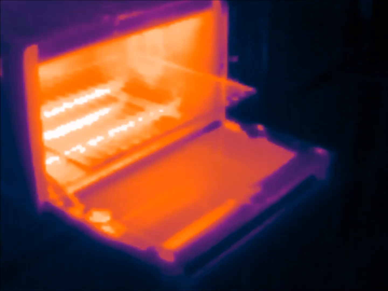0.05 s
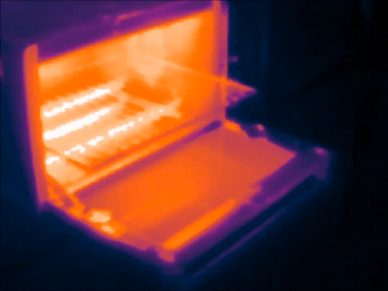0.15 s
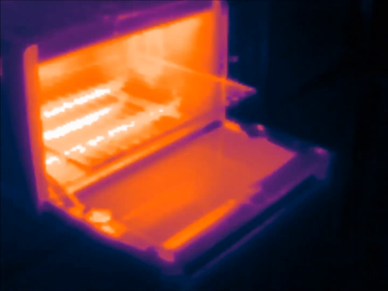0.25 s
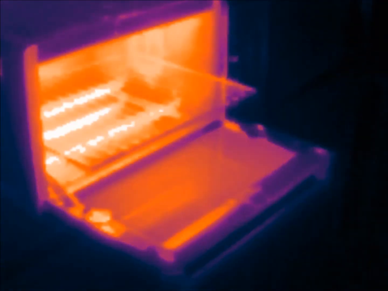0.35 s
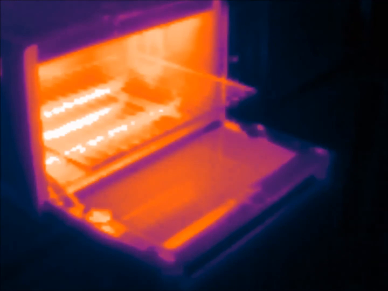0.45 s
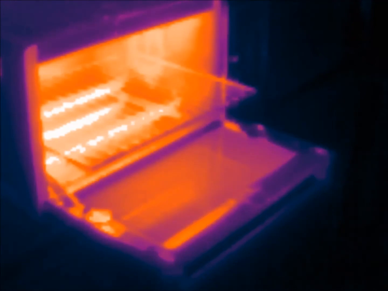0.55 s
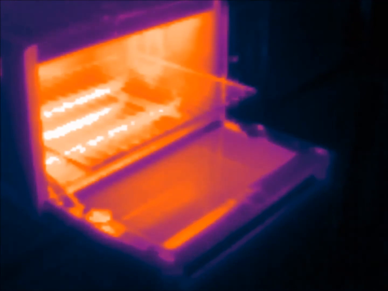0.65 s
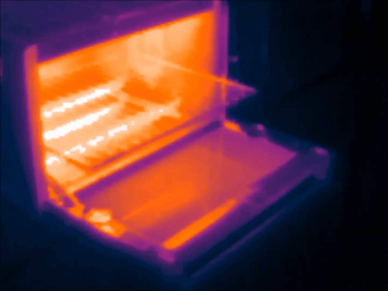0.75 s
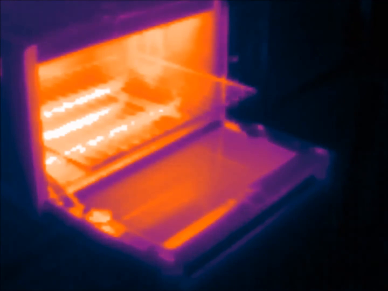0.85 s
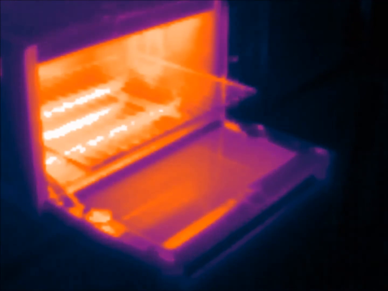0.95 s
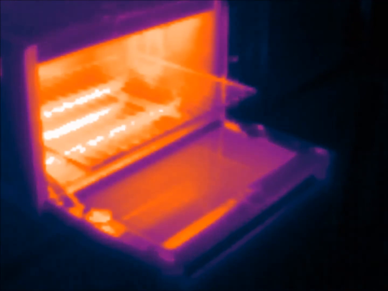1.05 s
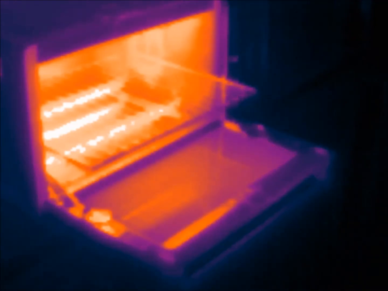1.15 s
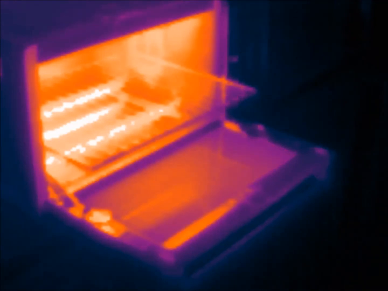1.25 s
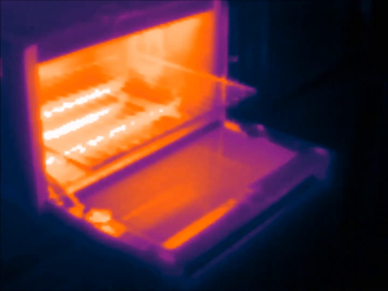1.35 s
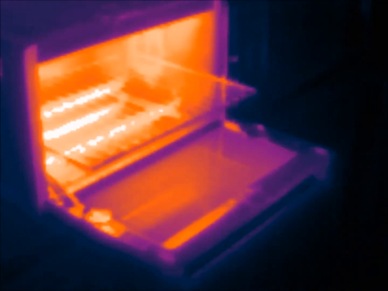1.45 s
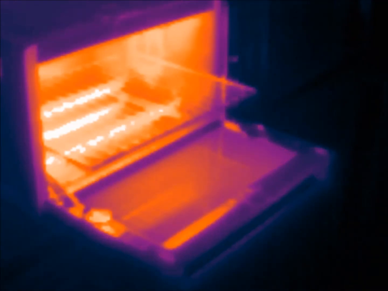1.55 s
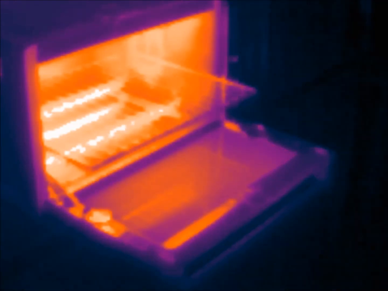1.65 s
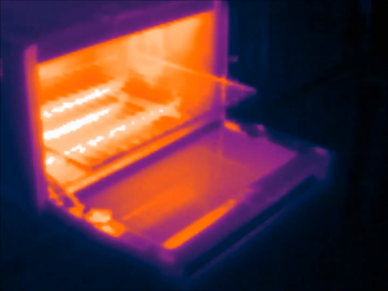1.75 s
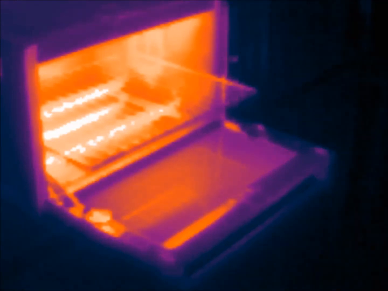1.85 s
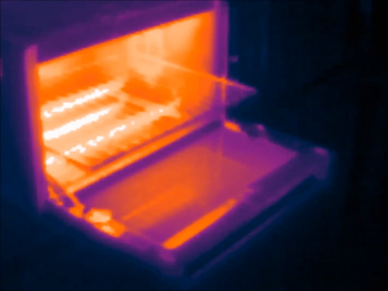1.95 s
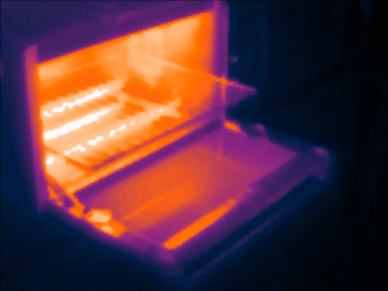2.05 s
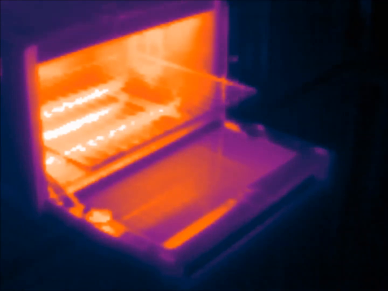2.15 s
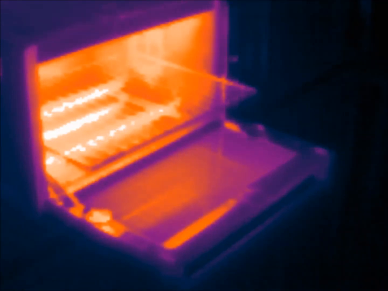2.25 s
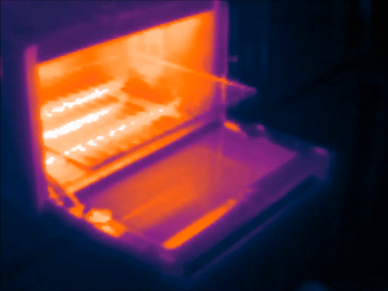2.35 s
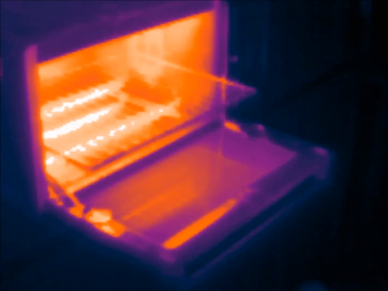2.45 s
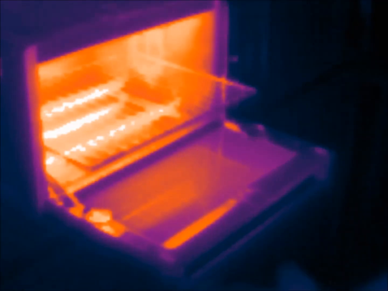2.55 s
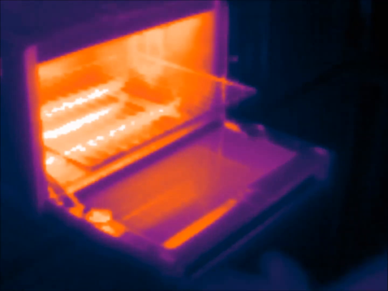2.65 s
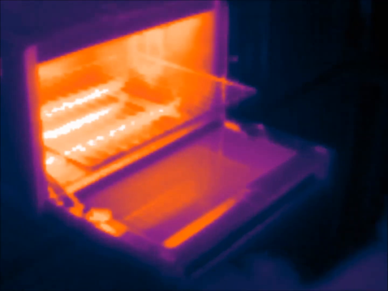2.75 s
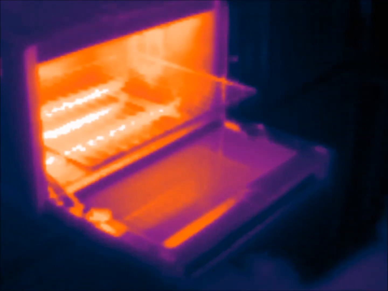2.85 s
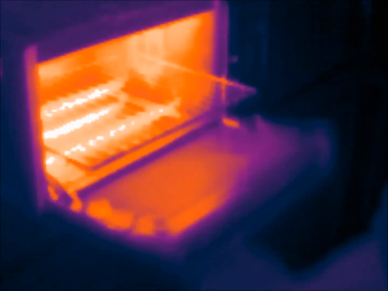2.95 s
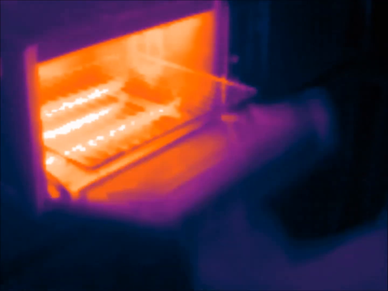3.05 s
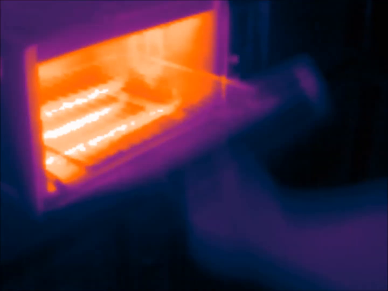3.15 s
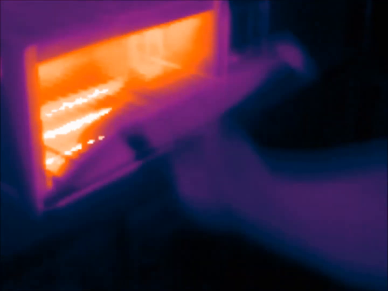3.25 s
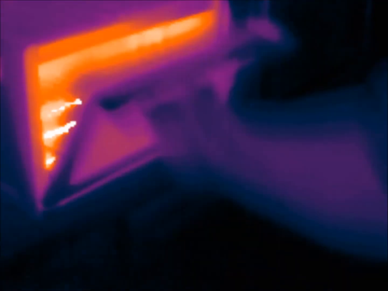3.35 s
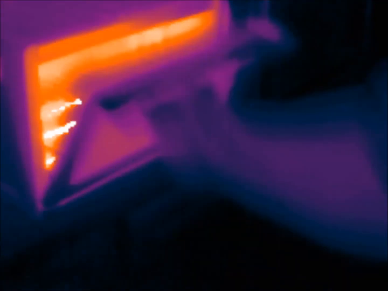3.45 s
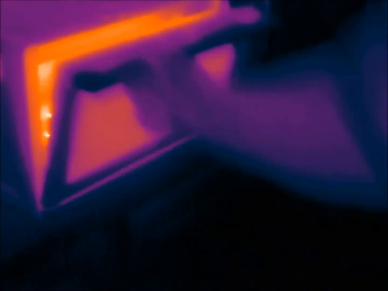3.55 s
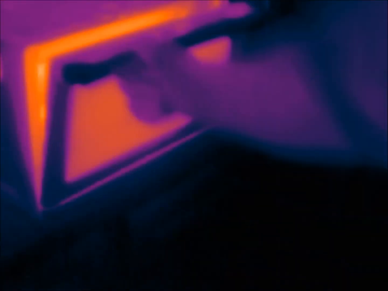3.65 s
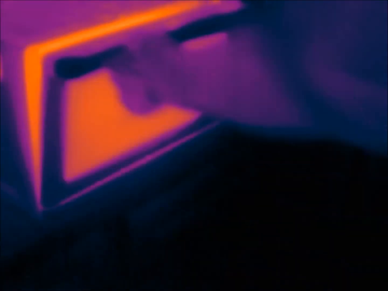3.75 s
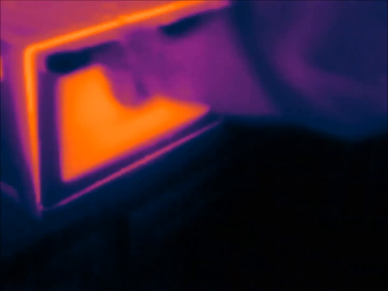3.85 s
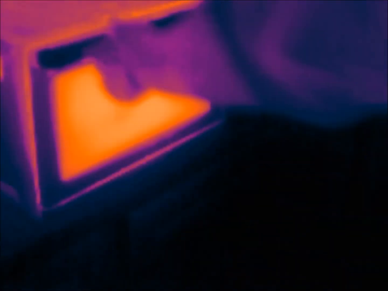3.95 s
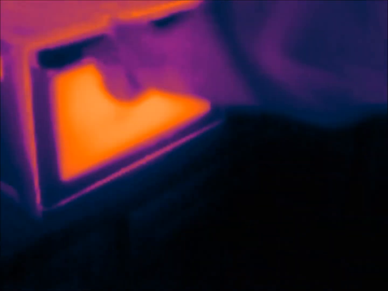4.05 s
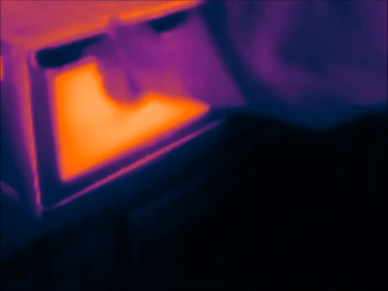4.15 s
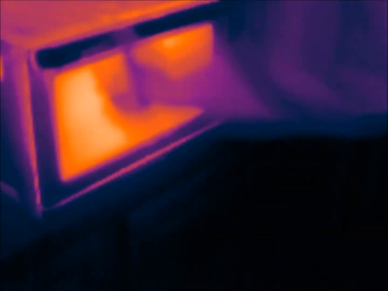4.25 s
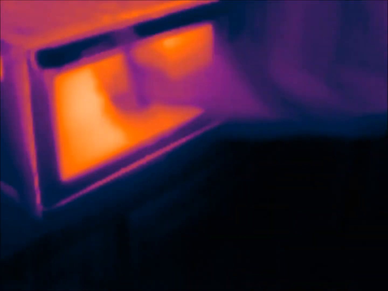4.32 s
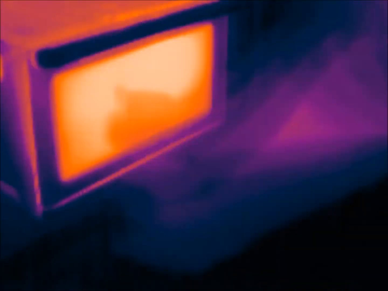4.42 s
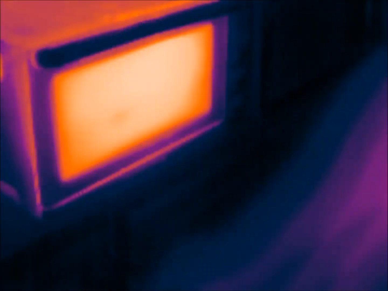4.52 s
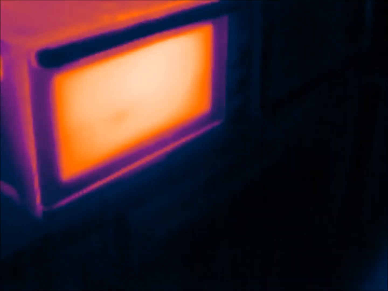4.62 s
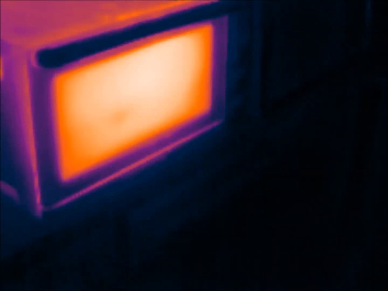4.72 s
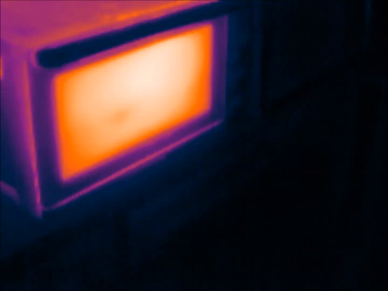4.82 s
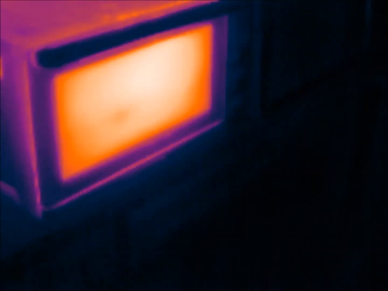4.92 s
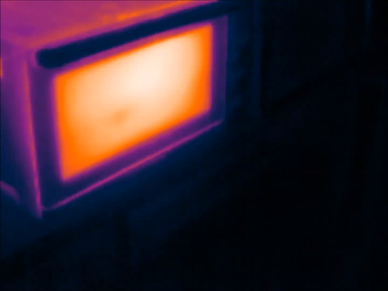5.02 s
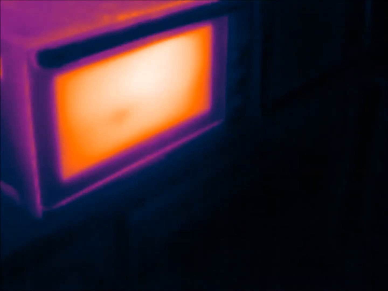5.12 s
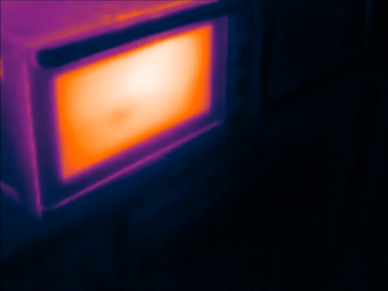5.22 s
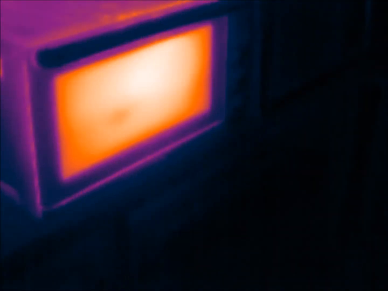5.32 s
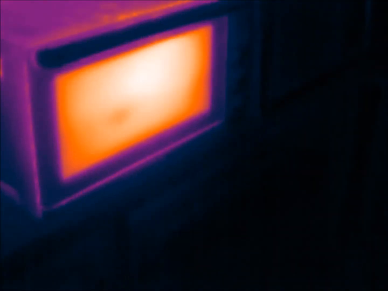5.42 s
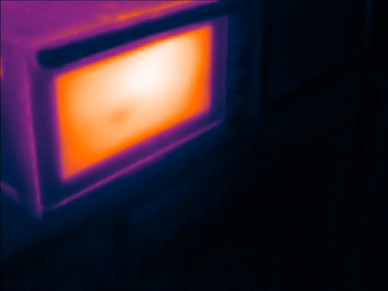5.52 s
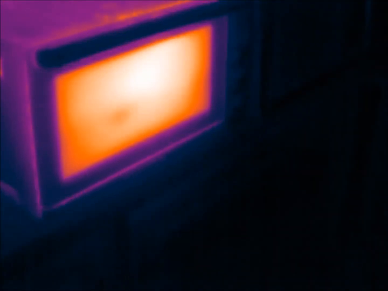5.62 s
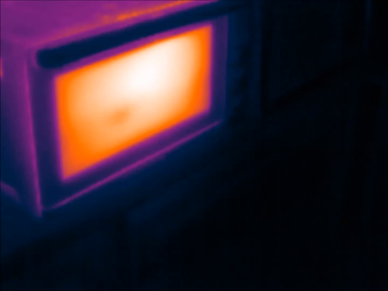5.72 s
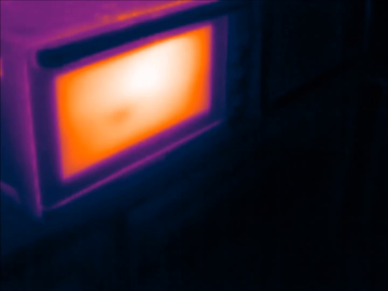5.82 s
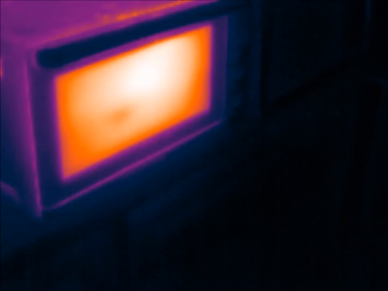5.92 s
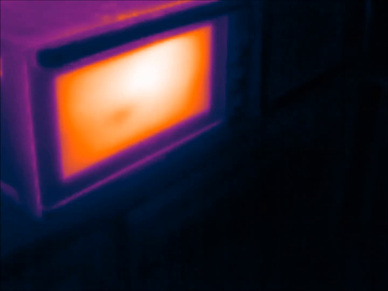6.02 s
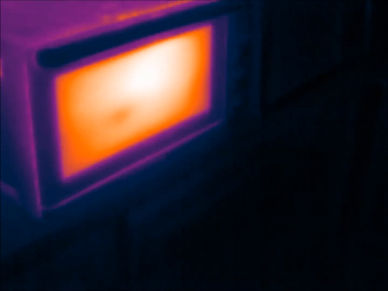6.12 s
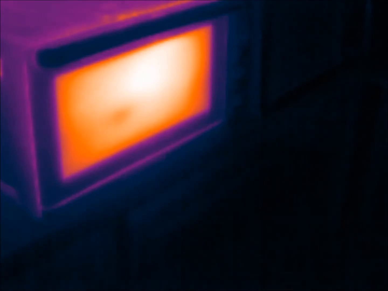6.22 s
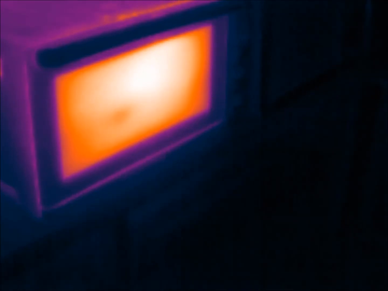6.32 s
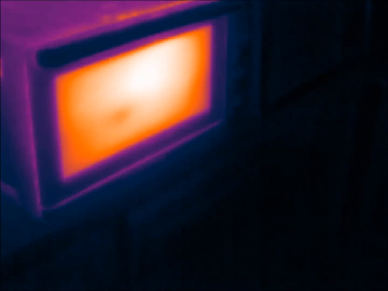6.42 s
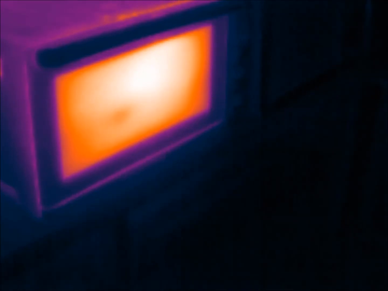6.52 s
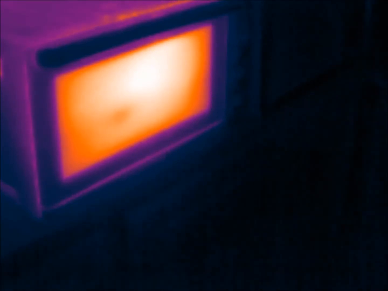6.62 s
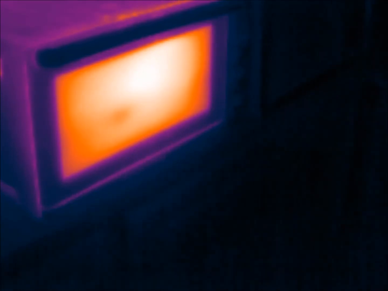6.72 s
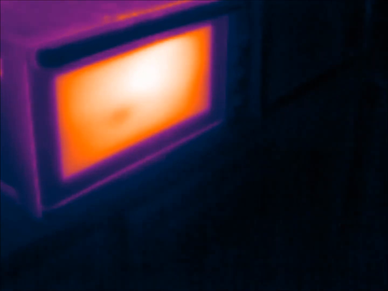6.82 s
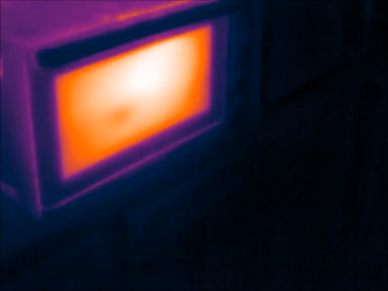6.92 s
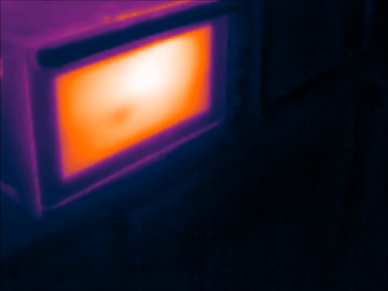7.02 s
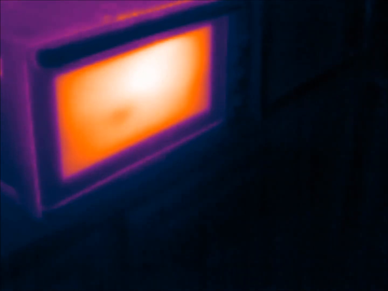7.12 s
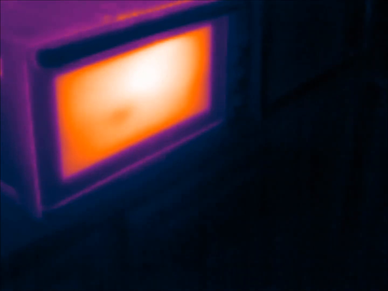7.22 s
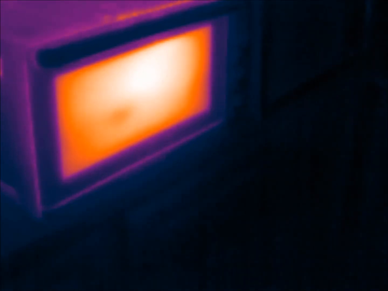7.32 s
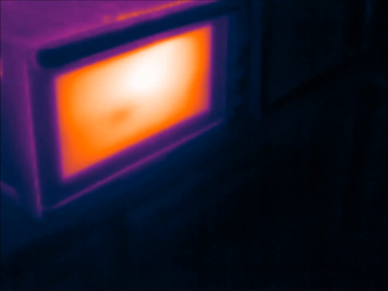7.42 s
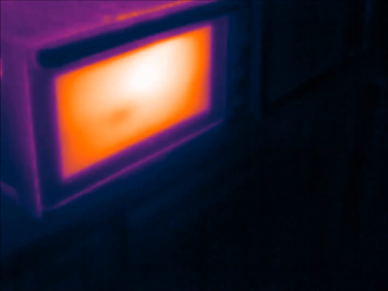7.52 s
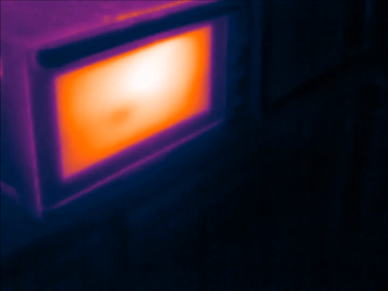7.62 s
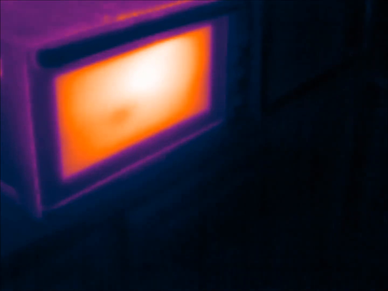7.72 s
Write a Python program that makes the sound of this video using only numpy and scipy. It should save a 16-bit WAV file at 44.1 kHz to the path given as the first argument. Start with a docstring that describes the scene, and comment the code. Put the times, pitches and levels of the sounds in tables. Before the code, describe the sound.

Over a low kitchen hum, a sharp mechanical double clack, then a toaster oven door scrapes and clatters shut, its springs throbbing on before more clacks.

```python
"""A humming kitchen: a toaster oven's steel door is swung up and its hinge arms drag the wire rack in. Random
slips and ten blows drive noise-built sheet metal and sine modes: scraping, clatter. The door is pressed shut:
pane modes boom, and spring modes of close pitch throb on for seconds. Close by, a camera shutter clacks shut
and open, twice, as bouncing filtered knocks. Noise bumps thud softly further off, over air noise, hum and hiss."""
import sys
import numpy as np
from scipy import signal
from scipy.fft import rfft, irfft, next_fast_len
from scipy.io import wavfile

SR = 44100
rng = np.random.default_rng(int(sys.argv[2]) if len(sys.argv) > 2 else 0)


def dump(signal):
    """Clip the signal to [-1, 1] and save it as 16-bit WAV at the path in sys.argv[1]."""
    limited = np.clip(np.atleast_2d(signal).T, -1, 1)
    pcm = np.round(limited * 32767).astype(np.int16)
    wavfile.write(sys.argv[1], SR, pcm)


N = 342764
TIME = np.arange(N) / SR  # s


def amp(db):
    """Decibels to amplitude gain."""
    return np.exp(np.asarray(db) * (np.log(10) / 20))


def unit(x):
    """Scales to rms 1."""
    return x / np.sqrt(np.mean(x ** 2) + 1e-20)


def read(points, hz):
    """Interpolates a table on a log-frequency axis."""
    f, value = np.transpose(points)
    return np.interp(np.log(hz + 1), np.log(f + 1), value)


def add(mix, start_s, sound):
    """Adds a sound into the mix, in place, from start_s."""
    part = mix[max(round(start_s * SR), 0):][:len(sound)]
    part += sound[:len(part)]


def colour(x, spectrum):
    """Zero-phase filter from a table of (f/Hz, level/dB)."""
    size = next_fast_len(len(x), True)
    gain = amp(read(spectrum, np.fft.rfftfreq(size, 1 / SR)))
    return irfft(rfft(x, size) * gain, size)[:len(x)]


def causal(spectrum, size=2048):
    """Minimum-phase click with this spectrum: its energy comes as early as possible."""
    log_gain = np.log(amp(read(spectrum, abs(np.fft.fftfreq(size, 1 / SR)))))
    click = np.fft.ifft(np.exp(np.conj(signal.hilbert(log_gain)))).real
    return click[:size // 2]


def highpass(x, order, cutoff_hz):
    """Butterworth high-pass."""
    return signal.sosfilt(signal.butter(order, cutoff_hz, "high", fs=SR, output="sos"), x)


def fade(t, t60_s):
    """Exponential decay, -60 dB at t60_s."""
    return np.exp(-np.log(1000) * t / t60_s)


def ring(modes, t):
    """Sum of decaying sines (f/Hz, level/dB, t60/s) struck at t = 0."""
    return sum(amp(db) * fade(t, t60_s) * np.sin(2 * np.pi * hz * t) for hz, db, t60_s in modes)


def drift(rate_hz, t=TIME):
    """Slow random curve of about rms 1: rate_hz new values per second, joined by lines."""
    knots = rng.standard_normal(512)
    return np.interp(t * rate_hz, np.arange(len(knots)), knots) * np.sqrt(3 / 2)


# blows on the oven: t/s, relative level/dB, low-pass f/Hz (softer contact = lower)
BLOWS = [(3.161, -41, 7000), (3.245, -22.5, 12100), (3.261, -25, 3500), (3.282, -25, 1990),
         (3.317, -28.5, 700), (3.415, -38, 12000), (3.599, -47, 1500), (3.756, -34.5, 200),
         (4.042, -46.5, 1600), (4.063, -33.5, 500)]


def oven(slips_per_s=320, spread_db=6, modes_db=-42, blow_db=33, lowest_hz=70, clump_db=1.0):
    """The rack's many small slips and the blows on the oven shake its panels and wires."""
    slips = (rng.random(N) < slips_per_s / SR) * rng.choice([-1, 1], N)
    slips = unit(slips * amp(spread_db * rng.standard_normal(N).clip(-2, 1)))
    slips = unit(slips * amp(clump_db * drift(55)))  # the rack catches and lets go
    force = sliding(slips)
    panels = signal.oaconvolve(force, sheet_metal())[:N]
    for at_s, db, soft_hz in BLOWS:
        b, a = signal.butter(2, min(soft_hz, SR / 3), fs=SR)
        push = amp(db + blow_db) * signal.lfilter(b, a, signal.unit_impulse(512))
        add(panels, at_s, signal.oaconvolve(push, sheet_metal()))  # each blow lands on another spot
        add(force, at_s, push)
    # no deep bass: the panels' sound is cut below lowest_hz
    return highpass(panels + amp(modes_db) * wires(force), 4, lowest_hz)


# shoves (rack starts, rack is jerked in, door rubs into its frame):
# t/s, length/s, starting level/dB, starting brightness/dB
SHOVES = [(3.148, .075, -23.5, 0), (3.236, 0.32, -24, 5.5), (4.03, .09, -46.5, -21)]
GRAB_S, STOP_T60_S = 0.01, .13
SLOWING_DB_PER_S, DULLING_DB_PER_S = 44.5, 55.5


def sliding(slips):
    """Each shove starts a slide fast; friction slows it, quieter and duller, until it dies away."""
    dull = signal.lfilter(*signal.butter(1, 1500, fs=SR), slips)
    bright = slips - dull
    force = np.zeros(N)
    for at_s, length_s, db, bright_db in SHOVES:
        t = np.maximum(TIME - at_s, 0)
        stop = fade(np.maximum(t - length_s, 0), STOP_T60_S)
        speed = np.minimum(t / GRAB_S, 1) * amp(db - SLOWING_DB_PER_S * t) * stop
        force += speed * (dull + amp(bright_db - DULLING_DB_PER_S * t) * bright)
    return force


# crowd of sheet-metal resonances: f/Hz, relative level/dB per Hz
SHEET = [(60, -25.5), (120, -5), (330, 2), (560, 1.5), (720, -4), (1000, -7), (1900, -11), (3000, -15),
         (5000, -20.5), (6500, -34.5), (8000, -43.5), (12000, -32.5), (16000, -37)]
# its decay: f/Hz, t60/s
SHEET_T60 = [(120, 1), (500, 0.5), (2000, 0.58), (6000, 0.24), (14000, 0.13)]


def sheet_metal(early_db=2, early_t60_s=0.081):
    """Impulse response of dense panel modes, as noise: short crash, then a tail that dies soonest in the treble."""
    hz, t, z = signal.stft(rng.standard_normal(SR // 2), SR, nperseg=256)
    decay = fade(t, read(SHEET_T60, hz)[:, None])
    tail = signal.istft(z * decay, SR, nperseg=256)[1]
    crash = 1 + amp(early_db) * fade(TIME[:len(tail)], early_t60_s)
    tail = signal.fftconvolve(tail * crash, causal(SHEET, size=4096))
    return tail / np.linalg.norm(tail)


# clear modes of panels and rack wires: f/Hz, relative level/dB, t60/s
OVEN = [(136.6, -4, .5), (214.3, 0.5, 0.9), (274, -5.5, 0.89), (335, -6, 1.85), (378, -4.5, 0.83),
        (387.6, -20.5, 8), (462, -15, .35), (554, -21, 3.2), (550, 0.5, 0.41), (617, -13.5, 1.4),
        (696, -16, 2.71), (718, -12.5, 2), (775, -6.5, 0.77), (877, -2, 0.21), (930, -17.5, 1.2),
        (1006, -17.5, 1.1), (1163, -31.5, 2.2), (1217, -5.5, 0.47), (1500, -25.5, 1.2), (1680, -18, .9),
        (1900, -41.5, 2.3), (2046, -13, 0.15), (2290, -20, 0.91), (2510, -27, 1.24)]


def wires(force, waver_db=3.5, wander_rad=1.0):
    """Each clear mode stores the energy fed to it and leaks it away, wavering as loose parts shift."""
    out, start_s = np.zeros(N), SHOVES[0][0]
    for hz, db, t60_s in OVEN:
        fed = force[round(start_s * SR):][:round((1 + t60_s) * SR)] ** 2
        t = TIME[:len(fed)]
        stored = signal.lfilter([1], [1, -fade(2 / SR, t60_s)], fed + 1e-20)  # energy: twice the dB rate
        waver = unit(amp(waver_db * drift(13, t)))
        tone = np.sin(2 * np.pi * hz * t + wander_rad * drift(19, t))
        add(out, start_s, np.sqrt(stored) * amp(db) * waver * tone)
    return out


# door springs: f/Hz, relative level/dB
SPRINGS = [(124.17, -50), (125.37, -38.5), (131.09, -43), (134.73, -46), (138.18, -40.0), (139.92, -47.5),
           (142.13, -40)]
# door pane and the air behind it: f/Hz, relative level/dB, t60/s
PANE = [(130.3, 8, 0.21), (161.5, -8, 0.55), (186.3, -16, 0.46), (209, -5.5, 0.34)]
# catch pinging as the door seats: f/Hz, level/dB, t60/s
CATCH = [(3380, -60.5, .1)]


def door(swung_s=3.25, shut_s=4.042, boom_db=-15, rise_s=0.038, springs_t60_s=8.07,
         swing_db=-4, shut_db=0, lowest_hz=80):
    """The springs' close modes beat; as the door seats, the pane booms and they are struck afresh."""
    out, t = np.zeros(N), TIME[:4 * SR]
    swell = 1 - np.exp(-t / rise_s)
    springs = swell * ring([(hz, db, springs_t60_s) for hz, db in SPRINGS], t)
    add(out, swung_s, amp(swing_db) * springs)
    out *= np.interp(TIME, [shut_s - .1, shut_s + 0.045], [1, 0])  # the frame stops the swing
    boom = amp(boom_db) * swell * ring(PANE, t)
    add(out, shut_s, amp(shut_db) * springs + boom + ring(CATCH, t))
    return highpass(out, 3, lowest_hz)


# camera case, knock: f/Hz, relative level/dB per Hz
CASE = [(100, -36.5), (400, -25), (900, -15.5), (1300, -16), (1900, -6), (2500, -4.5), (3150, 2.5),
        (3550, -12.5), (3900, -4), (4300, 3), (5000, -17), (5600, -25), (7200, -44.5), (16000, -62)]
# sharp edge of a hard hit: f/Hz, relative level/dB per Hz
CASE_EDGE = [(500, -41), (6000, -21.5), (8000, -21), (10500, -16), (12500, -1), (16000, -6.5)]
# case modes: f/Hz, relative level/dB, t60/s
CASE_MODES = [(421, -28.5, .1), (2049, -29, 0.025), (2672, -26.5, .025), (3150, -20, 0.043),
              (4220, -29.5, 0.017), (4450, -30, 0.014)]


def shutter(rattle_db=-20, rattle_t60_s=0.033, edge_db=-17, room_db=-58, room_t60_s=0.16,
            brightening_db_per_db=0.37, modes_rise_s=0.00029):
    """Each impact is a sharp knock in the small case, with a brief rattle and a trace of the room."""
    t, out = TIME[:6000], np.zeros(N)
    edge = causal(CASE_EDGE)
    for at_s, db, hard_db, body_db in clacks():
        noise_level = amp(rattle_db) * fade(t, rattle_t60_s) + amp(room_db) * fade(t, room_t60_s)
        push = rng.standard_normal(len(t)) * noise_level
        push[0] = 1
        # f/Hz, gain/dB: a harder hit wakes the upper resonances
        lift = [(500, 0.00062), (1800, body_db), (2600, 0.0011), (3200, 0.0017),
                (4200, brightening_db_per_db * hard_db)]
        knock = causal([(hz, level + read(lift, hz)) for hz, level in CASE])
        modes = ring([(hz, level + read(lift, hz), t60_s) for hz, level, t60_s in CASE_MODES], t)
        body = knock / abs(knock).max() + amp(edge_db + hard_db) * edge / abs(edge).max()
        struck = signal.fftconvolve(push, body)[:len(t)]
        add(out, at_s, amp(db) * (struck + modes * (1 - np.exp(-t / modes_rise_s))))
    return out


# shutter cycles: t/s, level/dB, first bounce/s, loss per bounce/dB
SHUTTER_CYCLES = [(1.212, -1.5, .0049, 6), (6.2137, 0, .0018, 7)]
# shutting stroke (release, two stops, settling): t after release/s, relative level/dB, hardness/dB
SHUTTING = [(0, -20.5, -3.5), (.0064, -7, 1.5), (.016, -7, 2), (.0615, -50.5, -19.5)]
# opening stroke (release, stop, rebound, settling): t after release/s, relative level/dB, hardness/dB
OPENING = [(0, -22.5, -6.5), (.008, -6.5, -6), (.0155, -21, -6), (.043, -37, -12)]
SHUT_FOR_S = 0.3727  # shutting release to opening release
OPEN_DAMPING_DB = 5.5  # extra loss per bounce when opening
SHUT_BODY_DB, OPEN_BODY_DB = 4.5, -3.5  # case gain around 1800 Hz


def clacks():
    """The blade shuts, waits and opens: same contacts each cycle, with that cycle's level and bounce."""
    rows = []
    for at_s, db, bounce_s, loss_db in SHUTTER_CYCLES:
        open_s, open_loss_db = at_s + SHUT_FOR_S, loss_db + OPEN_DAMPING_DB
        rows += bounces(SHUTTING, at_s, db, bounce_s, loss_db, SHUT_BODY_DB)
        rows += bounces(OPENING, open_s, db, bounce_s, open_loss_db, OPEN_BODY_DB)
    return rows


BOUNCE_SHRINK = .8  # length ratio of successive bounces


def bounces(stroke, start_s, level_db, first_s, loss_db, body_db, count=3):
    """Each contact repeats, sooner, weaker and softer: rows (t/s, level/dB, hardness/dB, body/dB)."""
    delays_s = np.cumsum([0] + [first_s * BOUNCE_SHRINK ** k for k in range(count - 1)])
    return [(start_s + after_s + delay_s, level_db + db - k * loss_db, hard_db - k * loss_db, body_db)
            for after_s, db, hard_db in stroke
            for k, delay_s in enumerate(delays_s)]


# soft bumps further off: t/s, level/dB, centre f/Hz, half-width at -6 dB/octaves, t60/s
BUMPS = [(.6, -62.5, 1020, 0.56, 0.62), (7.103, -28.5, 257, 0.52, 0.095), (7.116, -42.5, 170, 0.77, 0.73),
         (7.201, -48, 740, 0.51, 0.36), (7.243, -57.5, 1280, 0.64, 0.29), (7.353, -46.5, 150, 0.68, 0.11)]


def bumps(rise_s=0.0019):
    """Dull knocks blurred by the room: decaying noise in one broad band each."""
    t, out = TIME[:SR], np.zeros(N)
    skirt = [(-4, -30), (-1, -6), (0, 0), (1, -6), (4, -40), (8, -90)]  # half-widths, dB
    for at_s, db, centre_hz, octaves, t60_s in BUMPS:
        hump = [(centre_hz * 2 ** (k * octaves), level) for k, level in skirt]
        noise = unit(colour(rng.standard_normal(SR), hump))
        add(out, at_s, amp(db) * noise * fade(t, t60_s) * (1 - np.exp(-t / rise_s)))
    return out


# kitchen air: f/Hz, relative level/dB per Hz
AIR = [(20, -32), (50, -16.5), (75, -8), (125, -5.5), (150, -9.5), (290, -2.5), (380, -8.5), (420, -9),
       (500, -11), (1000, -20), (2500, -31.5), (8300, -44), (12500, -38.5), (15500, -39.5)]
AIR_DB = -57  # rms
# appliance hum: f/Hz, rms level before waver/dB
HUM = [(80.8, -63.5), (118.6, -67), (204, -70), (285, -71), (305.5, -71.5), (326, -84), (533, -82.5)]
# thin high hiss: t/s, rms level/dB
HISS = [(0, -87), (3.1, -89), (3.6, -73.5), (5.5, -74), (7.7, -81.5)]


def kitchen(waver_db=1.5, wander_rad=.4):
    """Steady filtered air noise, hum sines wavering in level and phase, and high hiss."""
    air = amp(AIR_DB) * unit(colour(rng.standard_normal(N), AIR))
    hum = np.zeros(N)
    for hz, db in HUM:
        level = amp(db + waver_db * drift(4)) * np.sqrt(2)  # rms to peak
        hum += level * np.sin(2 * np.pi * hz * TIME + wander_rad * drift(3.6))
    hiss_spectrum = [(2000, -2.0), (8000, -14.0), (12500, 4.5), (16000, 7.5)]  # f/Hz, relative level/dB
    hiss = unit(colour(rng.standard_normal(N), hiss_spectrum))
    return air + hum + amp(np.interp(TIME, *np.transpose(HISS))) * hiss


def scene():
    """Sum of all sources, one channel."""
    return (oven() + door() + shutter() + bumps() + kitchen())[None]


EDGE_HZ = 16000


def record(dry):
    """Band limit: linear-phase low-pass at EDGE_HZ."""
    lowpass = signal.firwin(511, EDGE_HZ, window=("kaiser", 9), fs=SR)
    return signal.oaconvolve(dry, lowpass[None], "same")


dry = scene()
out = record(dry)
dump(out)
```